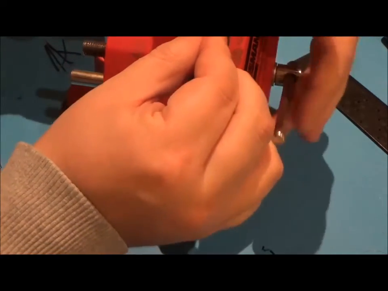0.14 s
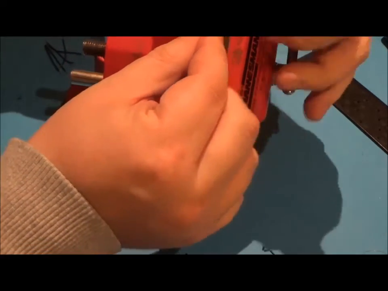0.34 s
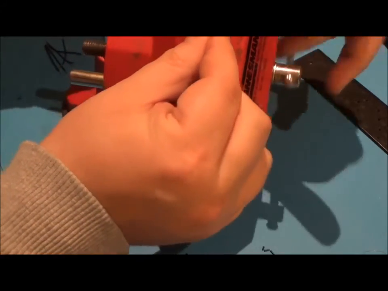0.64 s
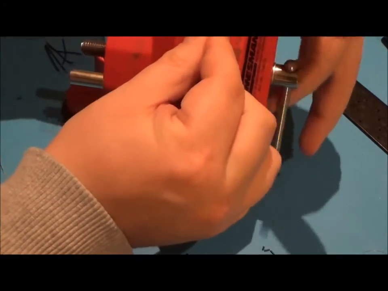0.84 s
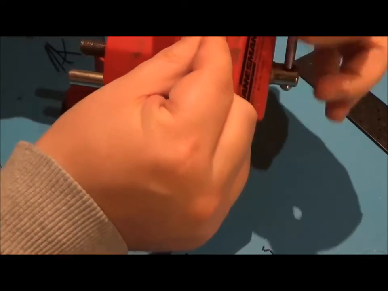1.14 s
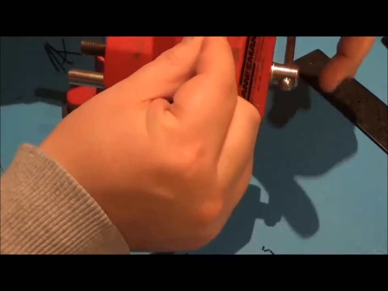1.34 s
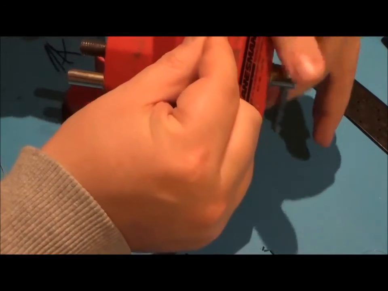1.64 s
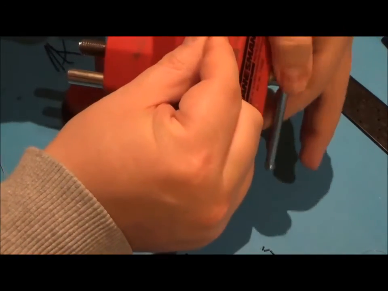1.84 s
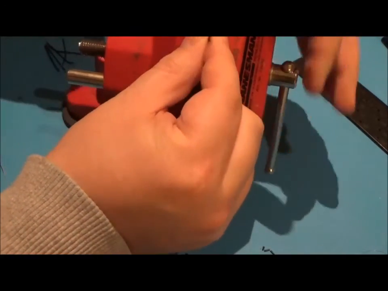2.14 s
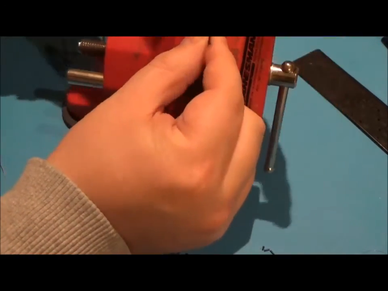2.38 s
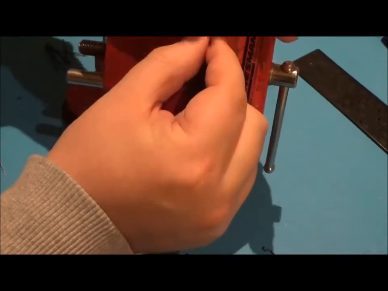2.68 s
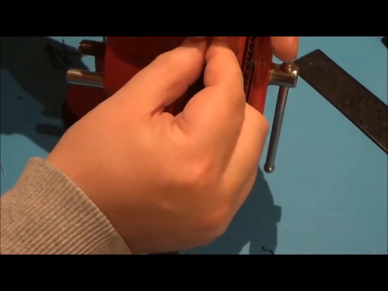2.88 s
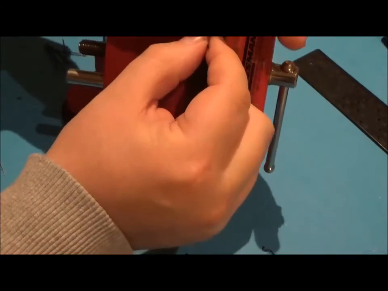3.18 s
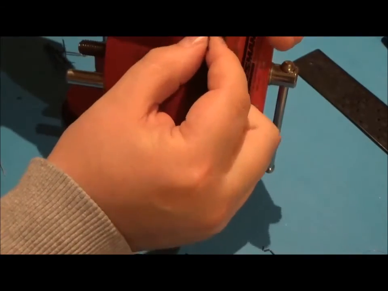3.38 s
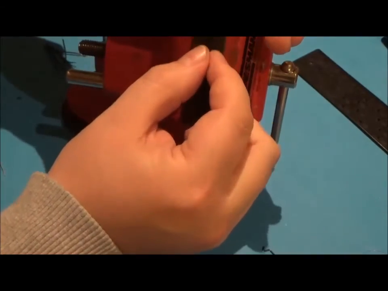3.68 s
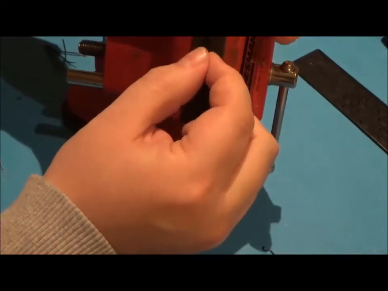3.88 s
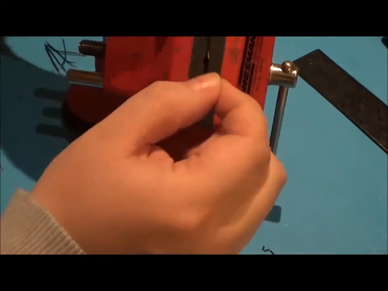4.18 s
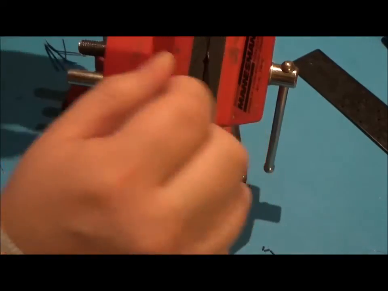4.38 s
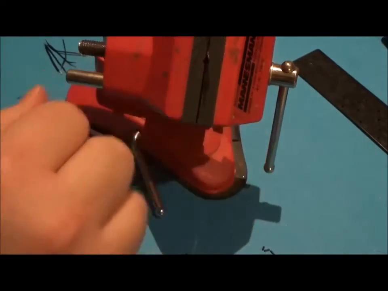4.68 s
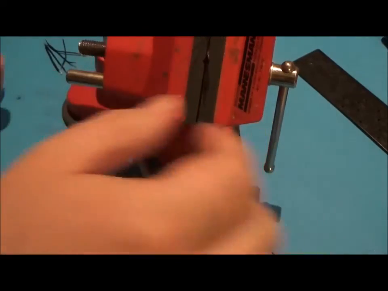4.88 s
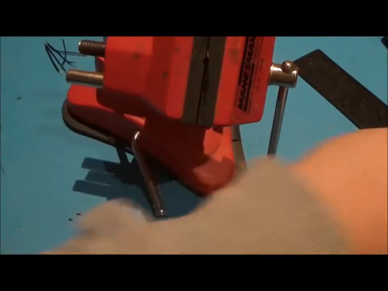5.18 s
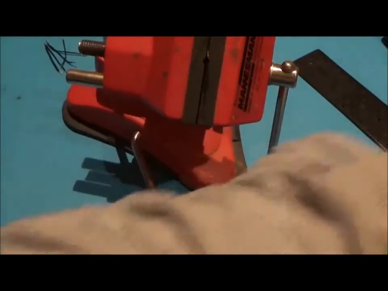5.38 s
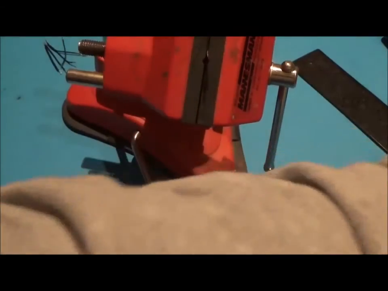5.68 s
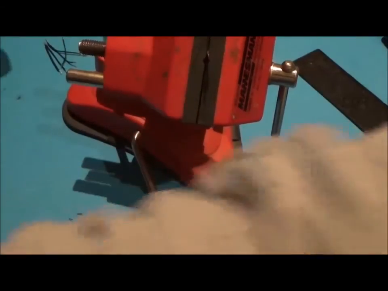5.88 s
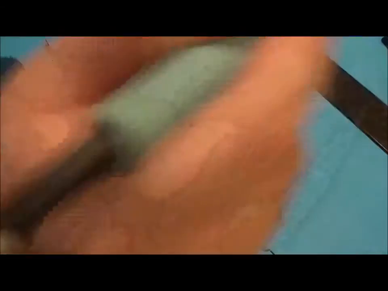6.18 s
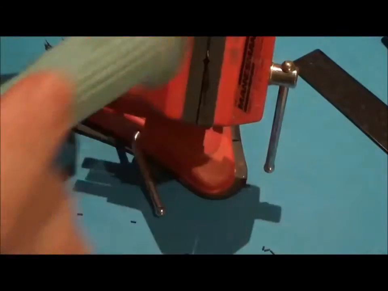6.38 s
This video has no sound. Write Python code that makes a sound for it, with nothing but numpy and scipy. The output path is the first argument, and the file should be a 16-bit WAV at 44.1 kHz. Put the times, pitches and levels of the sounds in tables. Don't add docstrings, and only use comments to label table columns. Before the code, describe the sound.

Close metallic clacks of a bench vise being wound, a quiet pause, then cloth rustle, sharp tool ticks and a springy metal slide.

```python
import sys
import numpy as np
from scipy import signal
from scipy.io import wavfile
from scipy.ndimage import uniform_filter1d

SR = 44100
rng = np.random.default_rng(int(sys.argv[2]) if len(sys.argv) > 2 else 0)


def makeup_ratio(level_db):
    decades = np.asarray(level_db, float) / 20
    return 10 ** decades


def output_pcm(signal):
    pcm = np.clip(np.atleast_2d(signal).T, -1, 1) * 32767
    wavfile.write(sys.argv[1], SR, np.round(pcm).astype(np.int16))


N = 287973
LEAD = 900


def evened(x):
    return x / np.sqrt(np.mean(np.square(x)) + 1e-20)


def read(points, hz):
    f, value = np.transpose(points)
    return np.interp(np.log(hz + 1), np.log(f + 1), value)


def add(mix, s, sound):
    part = mix[max(round(s * SR), 0):][:len(sound)]
    part += sound[:len(part)]


def resonate(x, hz, width):
    turn = np.exp(2j * np.pi * np.cumsum(hz * np.ones(len(x))) / SR)
    r = np.exp(-np.pi * width / SR)
    return 2 * (turn * signal.lfilter([1 - r], [1, -r], x / turn + 1e-18)).real


def modes(blows, table, level_db):
    return makeup_ratio(level_db) * sum(makeup_ratio(db) * resonate(blows, hz, 1.5 / t60) for hz, db, t60 in table)


def noise(spectrum, same, patchy_db):
    frames, hz = N // 256 + 5, np.fft.rfftfreq(1024, 1 / SR)
    a, b, c, d, patches = rng.standard_normal((frames, 513, 5)).T
    patches = uniform_filter1d(patches, size=12, axis=0)
    patches = evened(uniform_filter1d(patches, size=10, axis=1))
    same = np.clip(read(same, hz), -1, 1)[:, None]
    left, other = a + 1j * b, c + 1j * d
    z = np.array([left, same * left + np.sqrt(1 - same ** 2) * other])
    z *= makeup_ratio(read(spectrum, hz)[:, None] + patchy_db * patches)
    return evened(signal.istft(z, nperseg=1024, noverlap=768)[1][:, :N])


def curves(rows):
    s, *columns = np.transpose(rows)
    t = np.arange(N) / SR
    on = np.clip(np.minimum(t - s[0], s[-1] + 0.0026 - t) / 0.0026, 0, 1)
    return on, [np.interp(t, s, c) for c in columns]


def grit(density, depth_db):
    slips = evened(uniform_filter1d(rng.standard_normal(N), size=round(SR / density)))
    return evened(rng.standard_normal(N) * makeup_ratio(depth_db * slips))


def strikes(rows, spread, ring, rise, size=4410):
    out, t = np.zeros((2, N)), np.arange(size) / SR
    chatters = rng.standard_normal((len(rows), 2, size))
    for (s, low_db, low_hz, top_db, top_hz, t60), (low_grit, top_grit) in zip(rows, chatters):
        contact = (1 - np.exp(-(t / rise) ** 2)) * makeup_ratio(-60 * t / max(t60, .003))
        low = (low_db, low_hz, low_grit, spread * low_hz)
        top = (top_db, top_hz, top_grit, 0.76 * spread * top_hz)
        for db, hz, rough, width in (low, top):
            crack = contact * evened(resonate(resonate(rough, hz, width), hz, width))
            part = crack + contact * ring * np.sin(2 * np.pi * hz * t)
            small = signal.butter(3, 0.44 * hz, "high", fs=SR)
            near, wide = signal.lfilter(*small, [part, crack + 0.18 * (part - crack)])
            add(out[0], s, makeup_ratio(db) * near / abs(near).max())
            add(out[1], s, makeup_ratio(db) * wide / abs(wide).max())
    return out


def contacts(rows, t60):
    return [(*row, t60) for row in rows]


# f/Hz, level/dB per Hz
HISS_COLOUR = [(15, -27), (25, -25), (60, -13.5), (180, -9.5), (500, -13), (1000, -10), (1380, -13.5),
               (1610, -10), (1900, -14.5), (3300, -18.5), (6300, -23.5), (10400, -25.5), (11300, -25.5)]
# f/Hz, likeness/1
HISS_LIKENESS = [(60, 1), (140, 0.86), (350, 0.53), (840, 0.24), (2020, 0.28), (4860, 0.49), (11700, 0.81)]


def room_hiss():
    return makeup_ratio(-55) * noise(HISS_COLOUR, HISS_LIKENESS, patchy_db=1.0)


# f/Hz, rms level/dB
WHINE_TONES = [(703.4, -63), (351.5, -76.5), (526, -76), (1045, -75), (7850, -83.5)]


def whine():
    t = np.arange(N) / SR
    waver = 1.05 * evened(uniform_filter1d(rng.standard_normal(N), size=9000))
    return sum(makeup_ratio(db + waver) * np.sqrt(2) * np.sin(2 * np.pi * hz * t) for hz, db in WHINE_TONES)


SILENT_PIPS = [39, 66, 108, 120, 133, 134, 154, 155, 156, 158]


def lens_motor():
    start_s, every_s = .0297, .04
    t = np.arange(-330, 331) / SR
    pip = signal.windows.tukey(len(t), .6) * np.cos(2 * np.pi * 2082 * t)
    pip += makeup_ratio(-6.0) * np.exp(-((t + 0.0058) / 0.0014) ** 2) * np.cos(2 * np.pi * 3260 * t)
    out = np.zeros(N)
    for k, size in enumerate(rng.standard_normal(int(N / SR / every_s))):
        if k not in SILENT_PIPS:
            add(out, start_s + k * every_s + t[0], (-1) ** k * makeup_ratio(-54.0 + 0.74 * size) * pip)
    return out


# f/Hz, t60/s
ROOM_T60 = [(300, 0.48), (1000, 0.32), (3000, 0.4), (10000, 0.39)]
# f/Hz, level/dB
ROOM_TINT = [(300, 3.5), (2300, 2), (3000, -2), (6000, -0.5), (10000, -1.5)]


def room(x):
    taps = np.zeros((2, SR // 2))
    at = np.arange(200, SR // 2 - 20, 20)
    at = at + rng.integers(0, 20, (2, len(at)))
    np.put_along_axis(taps, at, rng.choice([-1., 1.], at.shape), 1)
    hz, t, z = signal.stft(taps, SR, nperseg=256)
    decay_db = read(ROOM_TINT, hz)[:, None] - 60 * t / read(ROOM_T60, hz)[:, None]
    tail = signal.istft(z * makeup_ratio(decay_db), SR, nperseg=256)[1]
    tail = tail + 0.4 * tail[::-1]
    return signal.fftconvolve(x[None], tail / np.linalg.norm(tail[0]), axes=1)[:, LEAD:LEAD + N]


def microphone(x):
    x = signal.sosfilt(signal.butter(2, 75, "high", fs=SR, output="sos"), x)
    mid, side = (x[0] + x[1]) / 2, (x[0] - x[1]) / 2
    opposed = resonate(mid, 6310, 1182)
    thrown = 0.11 * np.roll(resonate(mid, 4870, 2496), shift=9) + 0.25 * np.roll(opposed, shift=2)
    thrown += 0.36 * resonate(mid, 11460, 700) - 0.158 * resonate(mid, 9300, 1100)
    return mid - 0.59 * opposed + (side + thrown) * [[1], [-1]]


# t/s, low ring level/dB, low ring f/Hz, top ring level/dB, top ring f/Hz
PAST_BLOW = [
    (0, -27, 1020, -25, 2080),
    (0, -25.5, 4000, -24, 9340),
]


def earlier_blow():
    return strikes(contacts(PAST_BLOW, 0.042), spread=0.73, ring=0.47, rise=0.00067)[1]


# f/Hz, level/dB, t60/s
BENCH_MODES = [(104.8, 0, 0.48), (141.8, -3.5, 0.32), (206.3, -7, 0.38), (251.6, -6, 0.23),
               (316, -11, 0.17), (495, -9.5, 0.11), (628, -18, 0.18), (820, -6, 0.12)]


def bench_ring(blows, level_db):
    return modes(blows, BENCH_MODES, level_db)


# t/s, speed level/dB, weight on the bench level/dB
SLEEVE_MOVES = [(4.45, -66, -73), (4.58, -57.5, -60), (4.64, -66, -86), (4.8, -80, -81), (5.0, -58, -66),
                (5.1, -60, -90), (5.25, -52.5, -68), (5.42, -49, -64), (5.55, -50.5, -59), (5.66, -58, -60),
                (5.73, -52.5, -68), (5.83, -44.5, -48), (5.92, -54, -53.5), (6.04, -53, -56.5),
                (6.18, -58, -55.5), (6.28, -53, -63), (6.4, -60.5, -65), (6.53, -60, -54)]
# f/Hz, level/dB per Hz
CLOTH_COLOUR = [(880, -35), (1500, -24), (1900, -24), (2080, -25), (2570, -2), (3750, 1), (5300, 1.5),
                (6370, -2.5), (7350, -1.5), (11200, -3), (14600, -32), (22000, -120)]


def sleeve():
    on, (speed_db, weight_db) = curves(SLEEVE_MOVES)
    dull_db = -55.5 + 0.25 * (speed_db - speed_db.mean()) + 0.09 * (weight_db - weight_db.mean())
    wide = [(100, 0.96), (10000, 0.63)]
    dull_colour = [(200, -17), (350, 0.5), (900, -2), (1900, -2.5), (3000, -7), (9000, -80)]
    push_colour = [(50, -36), (90, -1.0), (330, 6.5), (900, -5), (2000, -60)]
    hiss = makeup_ratio(speed_db + 0.5) * noise(CLOTH_COLOUR, wide, patchy_db=-1.3)
    dull = makeup_ratio(dull_db - 4.0) * noise(dull_colour, wide, patchy_db=1)
    push = noise(push_colour, wide, patchy_db=3.5)
    stirred = evened([bench_ring(port, level_db=5) + 0.14 * port for port in push])
    return on * (hiss + dull + makeup_ratio(weight_db - 2.0) * stirred)


# t/s, low ring level/dB, low ring f/Hz, upper ring level/dB, upper ring f/Hz
GRIP_BUMPS = [(.01, -57, 150, -50.5, 290), (.228, -54, 140, -51, 248), (.43, -53.5, 140, -61, 260),
              (.69, -55, 74.6, -56, 139), (1.05, -56, 75, -56, 149), (4.854, -50.5, 130, -51, 232),
              (5.765, -52, 450, -44, 730), (5.803, -55, 302, -50, 820), (5.93, -52, 250, -56, 500),
              (6.02, -51, 246, -46.5, 862), (6.11, -45, 332, -60, 520), (6.237, -49, 130, -55, 265),
              (6.297, -33, 588, -38, 1320), (6.311, -33, 450, -40, 846), (6.49, -42, 503, -45, 1530)]


def grip_bumps():
    rows = [(*row, 0.065 + 7.4 / row[2]) for row in GRIP_BUMPS]
    return strikes(rows, spread=0.62, ring=1.33, rise=0.0014)


# t/s, pressure level/dB
SCRAPE_PRESSURE = [
    (4.846, -51),
    (4.862, -44),
    (4.89, -51.5),
    (4.91, -54),
    (4.93, -46),
    (4.955, -48.5),
    (4.965, -41),
    (5.0, -39),
    (5.012, -45),
]


def scrape():
    on, (db,) = curves(SCRAPE_PRESSURE)
    firm = np.maximum(db + 46.5, 0)
    low_db, top_db = -4.5 - 2.2 * firm, -8.5 - 1.2 * firm
    rub = grit(700, depth_db=1.8)

    def band(hz, width):
        return evened(resonate(resonate(rub, hz, width), hz, width))

    middle = 0.73 * band(4350, 1200) + 0.61 * band(4970, 1100)
    low = 0.7 * band(2120, 540) + 1.57 * band(3050, 1850)
    top = band(8000, 1600) + band(10600, 1800)
    return on * makeup_ratio(db) * (middle + makeup_ratio(low_db) * low + makeup_ratio(top_db) * top)


# t/s, level/dB, t60/s
SHAFT_JERKS = [
    (5.706, -41, .1),
    (5.772, -44, 0.12),
    (5.804, -39, 0.17),
]
# f/Hz, width/Hz, level/dB
COILS = [(1590, 25, -28), (3640, 39, -29), (4300, 230, -33), (5590, 24, -9.5), (7240, 40, 5), (7500, 73, 9),
         (8250, 48, -20), (9330, 120, -11)]


def slide():
    rise_s, end_s, start_s = 0.007, 5.92, SHAFT_JERKS[0][0]
    clock = np.arange(N) / SR
    t = clock - start_s
    level = makeup_ratio(-57.5)
    for s, db, t60 in SHAFT_JERKS:
        since = np.maximum(clock - s, -1)
        level = level + np.clip(1 + since / rise_s, 0, 1) * makeup_ratio(db - 60 * np.maximum(since, 0) / t60)
    level = level * (t > 0) * np.clip((end_s - clock) / rise_s, 0, 1)
    low_db = 5.5 - 56 * np.clip(t, 0, 1)
    rub = grit(420, depth_db=3.5)
    high = 0.34 * evened(resonate(rub, 8500, 4000))
    low = evened(resonate(resonate(rub, 1720, 2600), 2500, 3000))
    for hz, width, db in COILS:
        coil = makeup_ratio(db) * evened(resonate(rub, hz, 5 * width))
        if hz > 6000:
            high = high + coil
        else:
            low = low + coil
    return level * (evened(high) + makeup_ratio(low_db) * evened(low))


def pings(rows, t60):
    return makeup_ratio([[0], [-10]]) * strikes(contacts(rows, t60), spread=0.034, ring=1.35, rise=0.00053)


# t/s, low ring level/dB, low ring f/Hz, top ring level/dB, top ring f/Hz
STAND_PINGS = [
    (5.806, -39, 1400, -46, 8800),
    (5.707, -38, 2170, -41, 7200),
    (5.512, -41, 2410, -42.5, 1600),
    (5.545, -44, 2700, -46, 2000),
]


def spring_pings():
    return pings(STAND_PINGS, t60=0.085)


# t/s, low ring level/dB, low ring f/Hz, top ring level/dB, top ring f/Hz
SMALL_TOOLS = [(4.8456, -35, 3980, -52, 9600), (4.851, -27.5, 2670, -31, 10740),
               (4.9219, -20, 4300, -24.5, 10800), (4.9364, -32, 3700, -47, 10800),
               (5.017, -32, 2220, -53, 8080), (5.031, -34, 4300, -53, 9440), (5.1731, -42, 2170, -44, 7580),
               (5.211, -44, 2130, -42, 4000), (5.226, -42, 2800, -52, 10000),
               (5.435, -23.5, 3050, -34, 10300), (5.5097, -15.5, 2550, -22, 11000),
               (5.705, -17, 2420, -34, 7200), (5.7648, -30, 2270, -36, 7700),
               (5.8019, -20.5, 4150, -47, 7200), (5.8052, -35, 1590, -24, 7750),
               (6.2345, -34, 3610, -42, 10800), (6.24, -42, 3300, -42, 10000),
               (6.3005, -28, 1880, -40, 3600)]
# t/s, level/dB, f/Hz, contact t60/s
BRIGHT_EDGES = [(4.8522, -26, 3930, .014), (4.8542, -33, 2100, .016), (4.9245, -26.5, 4000, .012),
                (4.9604, -32, 4200, .008), (5.0177, -33, 4300, .008), (5.223, -38, 4650, .01),
                (5.435, -27.5, 4200, .01), (5.5098, -12, 4100, .006), (5.7052, -19, 3200, .007),
                (5.7675, -32, 3300, .014), (5.4352, -33, 5030, .01), (6.2985, -37, 3500, .012)]


def tool_ticks():
    edges = [(s, db, hz, db - 14, 8300, t60) for s, db, hz, t60 in BRIGHT_EDGES]
    return strikes(contacts(SMALL_TOOLS, 0.0087) + edges, spread=.7, ring=1.4, rise=.00025)


# t/s, low ring level/dB, low ring f/Hz, upper ring level/dB, upper ring f/Hz, t60/s
BODY_RINGS = [(.6905, -28, 951, -38, 778, .11), (5.716, -50, 98.5, -63, 141, .6),
              (5.81, -49, 252.5, -45, 1120, 0.26), (5.855, -50, 135, -53, 820, .3),
              (6.297, -35, 495, -36, 826, 0.15), (6.299, -37, 323, -42, 650, 0.12),
              (6.3, -41.5, 206, -44, 1590, 0.14), (6.49, -33.5, 495, -45.5, 1656, 0.15),
              (6.491, -44, 1446, -44.5, 1180, 0.12), (6.496, -46.5, 144, -44, 934, 0.18),
              (6.302, -48, 130, -44, 1900, .1)]


def clear_rings():
    return strikes(BODY_RINGS, spread=0.14, ring=2.7, rise=0.0014, size=11025)[0]


# t/s, level/dB, f/Hz, partner level/dB, partner f/Hz, t60/s
SWINGING_BAR = [
    (.689, -35, 9300, -47, 9610, .25),
    (2.106, -46, 9340, -56, 9610, 0.13),
]


def free_bar():
    return strikes(SWINGING_BAR, spread=0.012, ring=0.81, rise=0.003, size=8820)[0]


# t/s, low ring level/dB, low ring f/Hz, top ring level/dB, top ring f/Hz
HANDLE_PINGS = [
    (.688, -14, 9308, -18, 10200),
    (.6915, -17, 9308, -34, 5600),
    (.959, -30.5, 5650, -30.5, 9850),
    (1.058, -23, 4600, -25, 10000),
    (1.058, -38, 2400, -27, 9100),
    (.317, -48, 3400, -37, 9300),
    (.226, -40, 9250, -34, 10800),
    (.8195, -28.5, 1160, -40, 2230),
    (1.013, -30, 5700, -22.5, 10800),
    (.688, -28, 3690, -30, 7800),
]


def handle_pings():
    return pings(HANDLE_PINGS, t60=0.013)


# t/s, middle ring level/dB, middle ring f/Hz, bar ring level/dB
BAR = [(0.035, -45, 3320, -49), (0.315, -42, 3380, -44), (0.3536, -39, 4000, -49), (0.6872, -21, 3690, -14),
       (0.6914, -27, 5400, -19), (0.809, -44, 5340, -60), (0.8209, -60, 3340, -61), (1.386, -48, 3300, -53),
       (2.0815, -37, 3300, -44), (2.084, -32, 5170, -39), (2.088, -39, 3500, -44),
       (2.1044, -26.5, 3400, -32.5), (2.1152, -28.5, 3070, -27), (2.1324, -33, 3600, -38)]
# t/s, middle ring level/dB, middle ring f/Hz, knob ring level/dB
KNOB = [
    (0.0074, -44, 3630, -46),
    (0.2325, -31, 5000, -31),
    (0.3284, -34, 4600, -28),
    (0.9582, -38, 3780, -34),
    (1.0012, -32, 3520, -29),
    (1.0119, -24.5, 3200, -22),
    (1.0138, -23.5, 5540, -17.5),
    (1.0466, -46, 3600, -46),
    (1.3735, -42.5, 2800, -49),
    (2.1959, -37, 3500, -40),
]
# t/s, middle ring level/dB, middle ring f/Hz, collar ring level/dB
COLLAR = [
    (0.2253, -33, 4100, -27),
    (0.429, -41, 3000, -47),
    (1.0576, -21.5, 3980, -22),
    (2.0578, -35, 4730, -41),
]


def handle_ticks():
    rows = []
    for ticks, top_hz in ((BAR, 9240), (KNOB, 10800), (COLLAR, 8080)):
        for s, db, hz, top_db in ticks:
            hard_db = max(max(db, top_db) + 29, 0)
            rows.append((s, db, hz, top_db, top_hz, 0.022 / makeup_ratio(0.3 * hard_db)))
    return strikes(sorted(rows), spread=1.0, ring=0.93, rise=0.001)


# f/Hz, level/dB, t60/s
VISE_MODES = [(576, -15.5, 0.165), (794, -12.5, 0.39), (950, -12.5, 0.035), (1086, -17.5, 0.0497),
              (1170, -24.5, 0.16), (2295, -21, 0.16), (2440, -14, 0.09), (4380, -31, 0.046),
              (10100, -28, 0.1)]


def vise_ring(blows):
    return modes(blows, VISE_MODES, level_db=16.5)


# t/s, low ring level/dB, low ring f/Hz, jaw ring level/dB, contact t60/s
MOVING_JAW = [(0.003, -40, 800, -48, 0.02), (0.0085, -30, 950, -39, 0.035), (0.212, -50, 1000, -48, 0.04),
              (0.225, -20, 1256, -28, 0.016), (0.317, -28, 1380, -54, 0.043), (0.33, -37, 930, -54, 0.023),
              (0.4305, -29.5, 886, -37, 0.021), (0.689, -44, 382, -33, 0.015),
              (0.81, -35.5, 1070, -48, 0.05), (0.959, -39, 1430, -31, 0.033),
              (0.967, -36, 2600, -32, 0.016), (0.976, -34.5, 857, -49, 0.071),
              (1.038, -30, 960, -36, 0.014), (1.251, -39.5, 387, -42.5, 0.0089),
              (1.68, -44, 386, -61, 0.025), (2.1095, -28, 880, -36, 0.019)]
# t/s, low ring level/dB, low ring f/Hz, jaw ring level/dB, contact t60/s
FIXED_JAW = [(0.035, -47, 1180, -38.5, 0.086), (0.2305, -26, 1380, -31, 0.03),
             (0.3075, -25, 877, -37, 0.022), (0.3215, -27, 980, -37, 0.016),
             (0.355, -53, 824, -37.5, 0.025), (0.376, -42, 900, -55, 0.04), (0.439, -44, 1000, -42, 0.02),
             (0.486, -45, 813, -50, 0.03), (0.682, -44, 1000, -44, 0.03), (0.6863, -25, 950, -26, 0.02),
             (0.6905, -18, 950, -18, 0.028), (0.819, -37, 1100, -37, 0.013),
             (1.012, -25.5, 1140, -27, 0.023), (1.046, -21, 996, -21, 0.018), (1.058, -22, 964, -18, 0.014),
             (1.072, -28.5, 930, -49, 0.019), (1.223, -41, 880, -62, 0.015),
             (1.386, -46.5, 756, -53, 0.013), (2.056, -30.5, 995, -38, 0.025),
             (2.07, -40, 1000, -48, 0.025), (2.08, -35, 1100, -37, 0.028), (2.101, -40, 1000, -46, 0.02),
             (2.104, -26.5, 990, -29.5, 0.042), (2.116, -30, 1000, -36, 0.025),
             (2.123, -32, 973, -38, 0.025), (2.132, -40, 950, -34, 0.03), (2.1965, -37, 980, -43, 0.03)]
# t/s, level/dB, f/Hz, contact t60/s
BASE_THUDS = [
    (.228, -38.5, 582, 0.09),
    (.312, -37, 600, 0.054),
    (.433, -40.5, 550, 0.027),
    (.689, -29.5, 563, 0.047),
    (.70, -38, 576, 0.1),
    (1.049, -40, 576, 0.041),
    (2.108, -37, 487, 0.1),
    (2.199, -45, 457, 0.038),
]


def vise_knocks():
    jaws = []
    for rows, jaw_hz in ((MOVING_JAW, 1548), (FIXED_JAW, 2330)):
        jaws += [(s, db, hz, jaw_db, jaw_hz, t60) for s, db, hz, jaw_db, t60 in rows]
    base = [(s, db, hz, db - 6, 796, t60) for s, db, hz, t60 in BASE_THUDS]
    knocks = strikes(sorted(jaws), spread=0.93, ring=1.35, rise=0.0016)
    return knocks + strikes(base, spread=0.61, ring=0.65, rise=0.0019)


def to_right(db):
    return makeup_ratio([[-db], [db]])


def scene():
    knocks, bumps = vise_knocks(), grip_bumps()
    ticks = handle_ticks() + handle_pings() + spring_pings()
    tools = tool_ticks() + scrape() + slide()
    ring = vise_ring(knocks[1] + ticks[1]) + bench_ring(bumps[1], level_db=1.5)
    near = (knocks[0] + ring + bumps[0]) * to_right(.15) + ticks[0] * to_right(.3)
    near += tools[0] * to_right(-.45) + clear_rings() + free_bar() * to_right(.4)
    spread = knocks[1] + ticks[1] + tools[1] + makeup_ratio(-3) * bumps[1] + ring
    spread = np.pad(spread, (LEAD, 0)) + np.pad(earlier_blow(), (0, LEAD))
    camera = whine() * to_right(.5) + lens_motor() * makeup_ratio([[1.1], [-1.5]])
    return microphone(near + makeup_ratio(-10.0) * room(spread) + sleeve()) + camera + room_hiss()


def roll_off(x):
    return signal.sosfilt(signal.butter(12, 12300, fs=SR, output="sos"), x)


def record(dry):
    band_limit = signal.firwin(767, 11075, window=("kaiser", 8), fs=SR)
    limited = signal.oaconvolve(dry, band_limit[None], "same")
    spilled = limited - .8 * limited ** 3 / (1 + (limited / .2) ** 2)
    return roll_off(spilled)


dry = scene()
out = record(dry)
output_pcm(out)
```